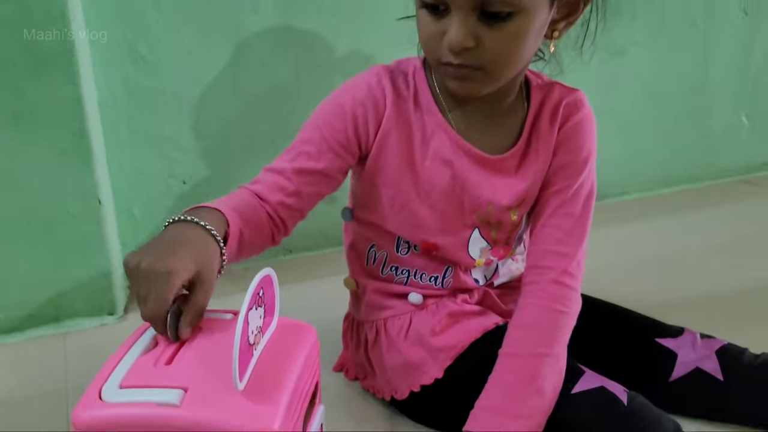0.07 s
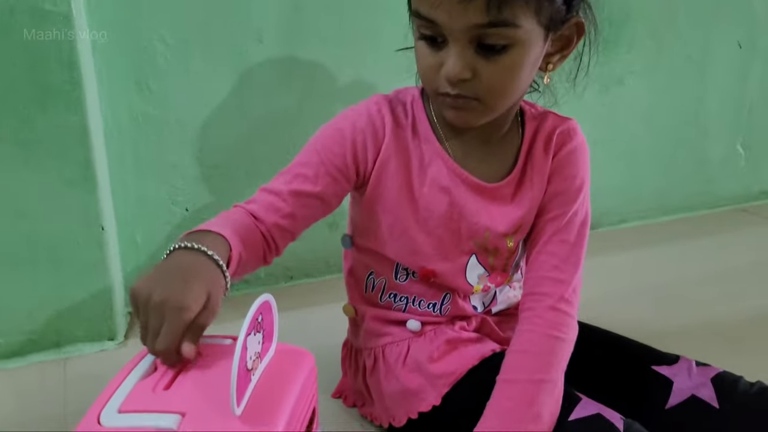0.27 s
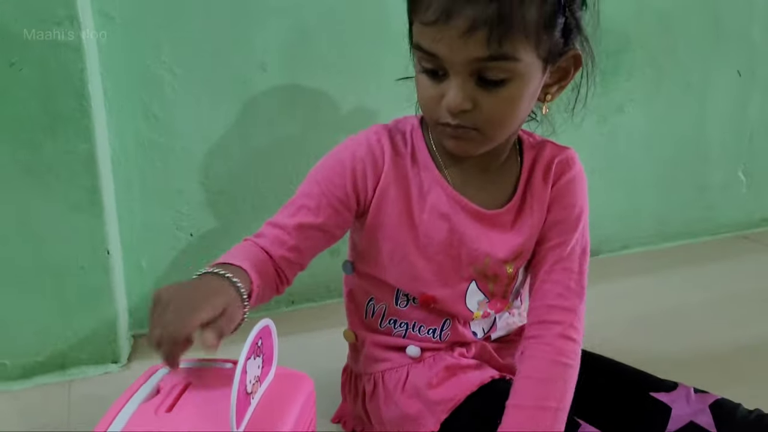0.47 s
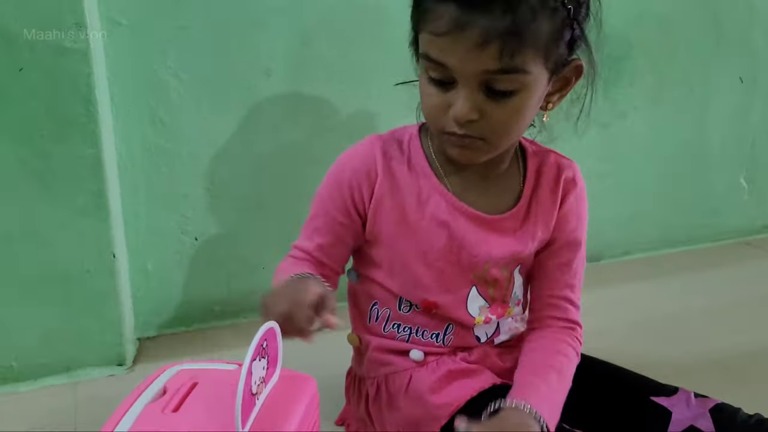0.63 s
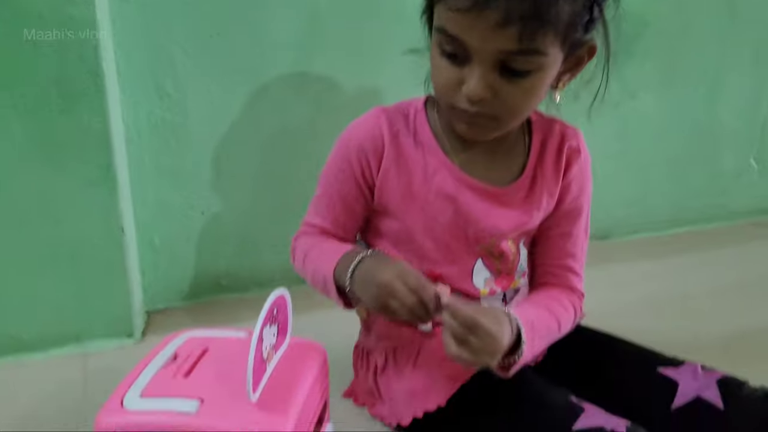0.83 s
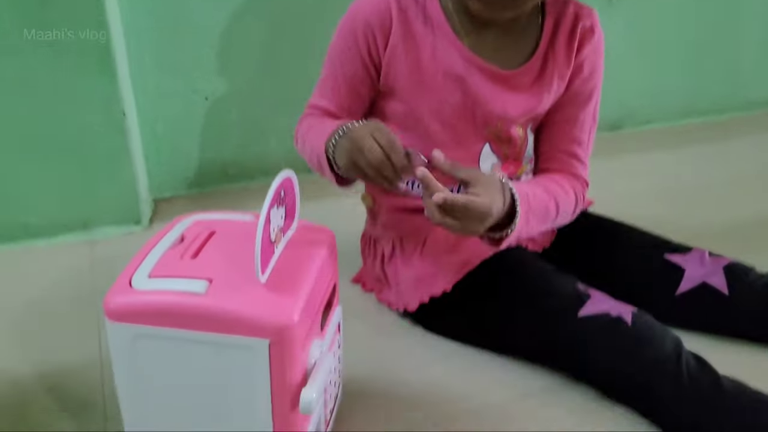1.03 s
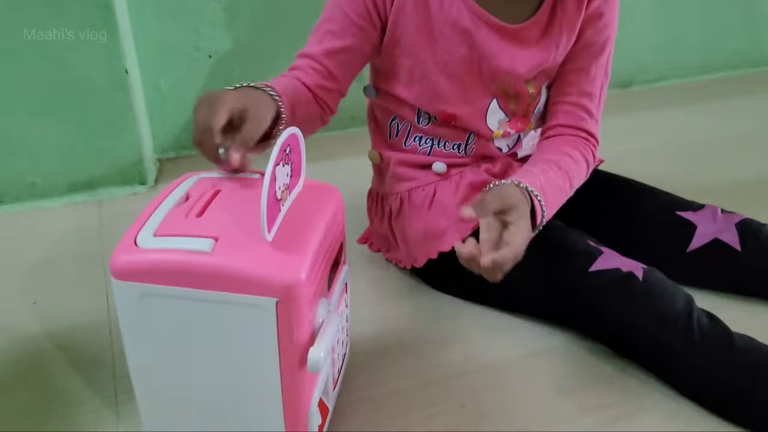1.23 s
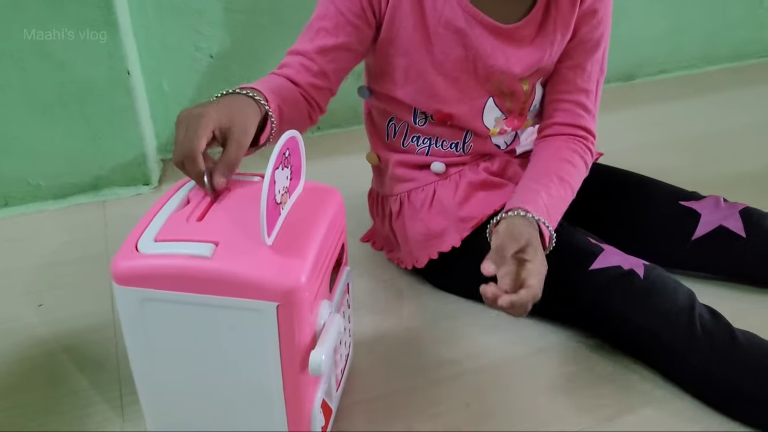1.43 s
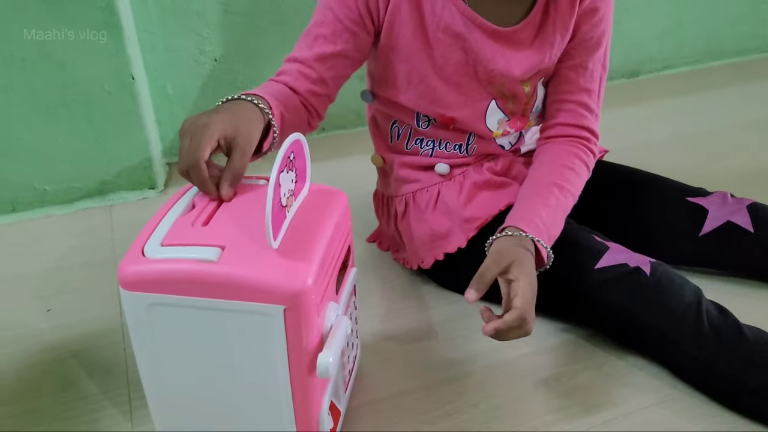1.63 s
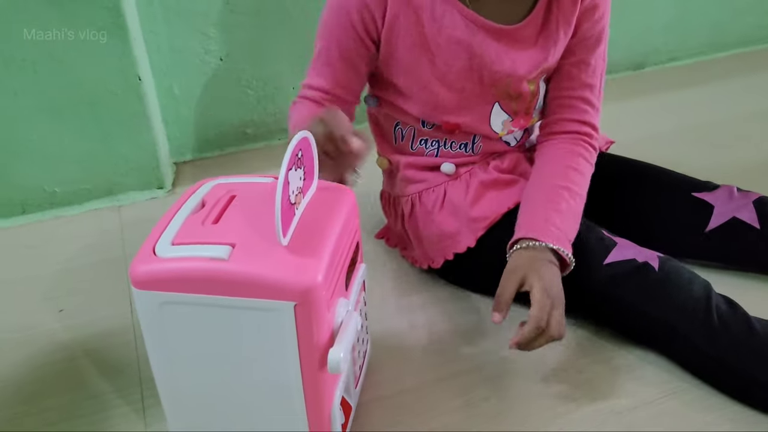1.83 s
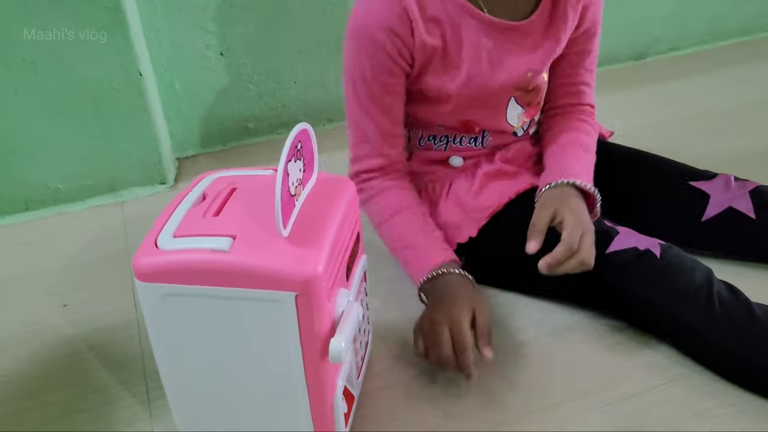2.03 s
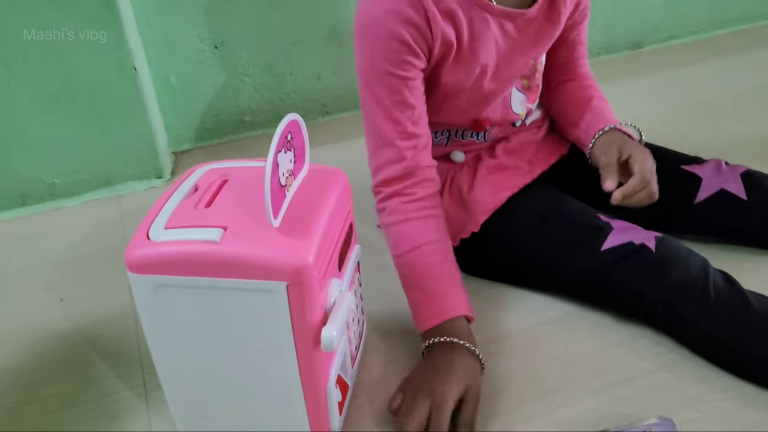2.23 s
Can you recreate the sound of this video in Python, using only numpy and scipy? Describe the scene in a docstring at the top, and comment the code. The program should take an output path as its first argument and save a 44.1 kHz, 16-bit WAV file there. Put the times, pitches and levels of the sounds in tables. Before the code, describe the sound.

Two coins drop into a hollow plastic toy bank. The first clicks in the slot at 0.2 seconds, thumps inside at 0.4 and rattles until 0.7, ringing thinly. Light taps come at 1.2 and 1.5. The second clicks at 1.6, lands at 1.75 and bounces until 2.0. A bangle tinkles faintly near 2.25. The quiet room echoes over a low hum, all on the right side.

```python
"""Two coins drop through the slot of a hollow plastic toy bank in a bare, quiet room.
Each clicks in the slot, thumps onto the bottom, then bounces and rattles to rest, ringing thinly.
Light handling taps fall in between, and a bangle tinkles at the end. The near floor and wall give
quick echoes, the hard room a long tail, over a soft rumble and a wavering hum.
The microphone is on the right channel; the left carries only faint hiss."""
import sys
import numpy as np
from scipy import signal
from scipy.fft import rfft, irfft
from scipy.io import wavfile

SR = 44100
rng = np.random.default_rng(int(sys.argv[2]) if len(sys.argv) > 2 else 0)


def digitize_waveform(pressure):
    """Quantize a signal to 16-bit integers and store it at the path in sys.argv[1].

    Rows of a 2-D input are taken as channels; values are limited to [-1, 1].
    """
    field = np.atleast_2d(pressure).T
    bounded = np.clip(field, -1, 1)
    quanta = np.round(bounded * 32767).astype(np.int16)
    wavfile.write(sys.argv[1], SR, quanta)


N = 101429

# colour of a knock inside the bank, also of the bangle's ticks: (frequency [Hz], gain [dB])
INSIDE_EQ = [(100, -34.5), (250, -15), (450, 3), (620, -3.5), (900, -2.5), (1120, -5.5), (1450, -4),
             (2900, 2.5), (5000, -1), (6000, -5), (7600, -4.5), (8600, -11.5), (12000, -5.5), (15300, -11)]


def amp(db):
    """Decibels to gain."""
    return 10 ** (np.asarray(db) / 20)


def unit(x):
    """Scales to rms 1."""
    return x / np.sqrt(np.mean(x ** 2) + 1e-20)


def read(points, hz):
    """Reads a table on a log-frequency axis."""
    f, value = np.transpose(points)
    return np.interp(np.log(hz + 1), np.log(f + 1), value)


def add(mix, s, sound):
    """Adds a sound to the mix at time s."""
    part = mix[round(s * SR):][:len(sound)]
    part += sound[:len(part)]


def high_pass(x, hz, order):
    """Cuts the lows."""
    return signal.sosfilt(signal.butter(order, hz, "high", fs=SR, output="sos"), x)


def noise(gain):
    """Noise of rms 1 with its spectrum shaped by gain(Hz)."""
    return unit(irfft(rfft(rng.standard_normal(N)) * gain(np.fft.rfftfreq(N, 1 / SR)), N))


def causal(curve_db):
    """Minimum-phase impulse response of energy 1, shaped by the gain curve."""
    log_gain = np.log(amp(np.concatenate([curve_db, np.flip(curve_db[1:-1])])))
    spectrum = np.exp(np.conj(signal.hilbert(log_gain)))
    response = np.fft.ifft(spectrum).real[:len(curve_db)]
    return response / np.linalg.norm(response)


def room_tone():
    """Soft background rumble and hiss with two wavering low tones."""
    # spectrum of the background: (frequency [Hz], relative density [dB])
    colour = [(18, -36), (30, 7), (92, -2), (144, 0.5), (202, 0.5), (249, 1), (399, -5), (970, -18),
              (1140, -19), (2300, -20), (3680, -27.5), (7650, -34), (8950, -42), (15500, -45)]
    # the two hum tones: (centre [Hz], half-width [Hz], trim [dB])
    hum_tones = [(139.4, 6, -1.5), (237.5, 6.7, -3.5)]
    # their wavering, before the trim: (time [s], lower tone [dB], upper tone [dB])
    hum_levels = [(0.0, -53, -58), (0.28, -60, -51), (0.35, -53, -69), (0.42, -47, -57), (0.53, -51, -67),
                  (0.98, -57.5, -61.5), (1.62, -48.5, -48.5), (1.82, -60, -42), (1.98, -48.5, -56),
                  (2.03, -45.5, -41), (2.26, -86, -54), (2.3, -66, -46)]
    out = amp(-47.5) * noise(lambda hz: amp(read(colour, hz)))
    times, *levels = np.transpose(hum_levels)
    for (centre, width, trim_db), level in zip(hum_tones, levels):
        band = noise(lambda hz: np.exp(-((hz - centre) / width) ** 2))
        tone = unit(np.cos(np.angle(signal.hilbert(band))))  # steady level, wandering pitch
        out += amp(trim_db + np.interp(np.arange(N) / SR, times, level)) * tone
    return out


def ring(modes):
    """Dying partials of a struck piece of metal."""
    t = np.arange(SR // 2) / SR
    return sum(amp(db - 60 * t / t60) * np.sin(2 * np.pi * (hz * t + rng.random()))
               for hz, db, t60 in modes)


def rim_pings():
    """A coin caught on its rim pings in one clear partial."""
    # rim strikes: (time [s], level [dB], pitch [Hz], t60 [s])
    pings = [(0.2011, -26, 4970, .07), (.2638, -26.5, 4950, 0.037), (0.278, -45, 14150, 0.076),
             (0.4047, -27.5, 11940, 0.083)]
    out = np.zeros(N)
    for s, db, hz, t60 in pings:
        add(out, s, ring([(hz, db, t60)]))
    return out


def shell_db(hz, spot):
    """The plastic shell's resonances, each excited by an amount that depends on the spot struck."""
    # resonances: (centre [Hz], width [Hz], lift at lid [dB], under first coin [dB], under second [dB])
    resonances = [(900, 174, 0, 6.5, 6), (1375, 236, 7.5, 10, 8), (1970, 170, 7, 4, 3.5),
                  (2542, 97, -6, 2.5, 8), (2810, 180, -1, 2.5, 6), (3100, 110, -1, 1, 1),
                  (3345, 120, 0, 4.5, -1.5), (5040, 580, 4.5, -1, 2), (6250, 490, 3.5, -2.5, 3.5),
                  (7410, 350, 8, 3.5, 5.5)]
    column = ["lid", "first", "second"].index(spot)
    return sum(lifts[column] / (1 + (2 * (hz - f) / width) ** 2) for f, width, *lifts in resonances)


def knock(colour, bass_db, treble_db, decay_ms, spot="lid", size=4096):
    """A burst of chattering contact, coloured by the shell's resonances."""
    rise_s, chatter_s, chatter_db = 0.00027, 0.000567, 3
    bass_hz, treble_hz = 1150, 6700
    t, hz = np.arange(size) / SR, np.fft.rfftfreq(size, 1 / SR)
    grain, chatter = rng.standard_normal((2, size))
    envelope = np.exp(-1000 * t / decay_ms) * (1 - np.exp(-t / rise_s))
    burst = grain * envelope * amp(chatter_db * np.interp(t / chatter_s, np.arange(size), chatter))
    burst *= np.linalg.norm(envelope) / np.linalg.norm(burst)
    bass_shelf = bass_db / (1 + (hz / bass_hz) ** 2)
    treble_shelf = treble_db * hz ** 2 / (hz ** 2 + treble_hz ** 2)
    curve_db = read(colour, hz) + bass_shelf + treble_shelf + shell_db(hz, spot)
    return signal.fftconvolve(burst, causal(curve_db))


def slot_clicks():
    """Coins knock against the slot in the lid and clink on their way in."""
    # contacts with the slot: (time [s], level [dB], bass [dB], treble [dB], decay [ms])
    clicks = [(0.2016, -27, -14, -14, 9.1), (0.207, -15, 4.5, -10.5, 2.72), (0.2658, -23.5, -4, 8, 1.8),
              (0.2785, -15.5, -10, 9.5, 2.9), (1.574, -51, -7, 34, 7), (1.6383, -42, -5, 16, 4.8),
              (1.66, -56, -7, 5, 3.5)]
    # colour of a knock at the slot: (frequency [Hz], gain [dB])
    colour = [(100, -2.5), (400, -2), (900, -2.5), (1450, -3), (2700, 0.5), (4000, 0), (5100, -2),
              (5800, -8.5), (7500, -6.5), (9000, -12.5), (13000, -15.5), (15000, -7.5)]
    # partials of a coin held in the slot: (frequency [Hz], level against the knock [dB], t60 [s])
    held_coin = [(1870, -31, 0.29), (3460, -29, .25), (4823, -40, 0.22)]
    out = np.zeros(N)
    for s, db, bass_db, treble_db, decay_ms in clicks:
        add(out, s, amp(db) * knock(colour, bass_db, treble_db, decay_ms))
        add(out, s, amp(db) * ring(held_coin))
    return out


def coin_bounces():
    """Each bounce knocks the plastic and sets the coin ringing."""
    # strikes inside the bank: (time [s], level [dB], bass [dB], treble [dB], decay [ms])
    strikes = [(0.3926, -14, -2, 5, 6.8), (0.4057, -12.5, 0, 4.5, 4.5), (0.4128, -21.5, 5, 16, 11.4),
               (0.4309, -28.5, 10, 3, 10.5), (.4649, -17.5, -3, -8, 6.2), (0.4834, -17.5, -19.5, -3, 4.8),
               (0.4881, -18.5, 5, -2, 2.7), (.4946, -13.5, -4, -4.5, 3.6), (0.499, -19, 8, 0, 1.95),
               (.5326, -21, -13, -13, 6), (0.5416, -39, -12, -5, 3.2), (0.5624, -45, 1, -15, 2.5),
               (0.6051, -24, -22, -6, 1.6), (.6638, -21.5, -19.5, -12, 5.1), (.6665, -29, -9, -9, 3.7),
               (0.6949, -37.5, -7, 7, 8.6), (1.7392, -12.5, 1, 3.5, 5.34), (1.7506, -23.5, 10, 10, 8.6),
               (1.7607, -19, -25, 5, 5.9), (1.7741, -19.5, 1.5, -0.5, 4.7), (1.7859, -27, -9, 0, 21),
               (1.8154, -17.5, 1, 0, 4.2), (1.8381, -29, -11, 48, 6.4), (1.8588, -25.5, 0, 0, 6.2),
               (1.9105, -31.5, 2, 10, 15), (1.9201, -22.5, -3.5, -3, 3.8), (1.927, -32.5, 3, 8, 6.4),
               (1.9856, -25.5, -16, -13, 7.9), (1.9993, -27.5, 18.5, 28, 8.6), (2.0221, -30, 10, 12, 5.2),
               (2.0341, -37.5, 2, 2, 5.5)]
    # partials of each coin: (frequency [Hz], level against the knock [dB], t60 [s])
    first_coin = [(4968, -30, .14), (7292, -29, .14), (7812, -31, .14), (11452, -29, .14),
                  (12052, -30, .13)]
    second_coin = [(2763, -22, .1), (11156, -35, .18), (12432, -34, .22), (14443, -33, .25),
                   (15429, -25, .22)]
    second_from_s = 1.
    out = np.zeros(N)
    for s, db, bass_db, treble_db, decay_ms in strikes:
        spot, coin = ("first", first_coin) if s < second_from_s else ("second", second_coin)
        add(out, s, amp(db) * knock(INSIDE_EQ, bass_db, treble_db, decay_ms, spot))
        add(out, s, amp(db) * ring(coin))
    return out


def bank_thumps():
    """The heavier bounces make the hollow bank boom in its lowest mode."""
    # booms: (time [s], level [dB], pitch [Hz])
    thumps = [(0.3939, -14, 347), (.406, -25, 326), (0.4951, -24, 341), (1.7407, -19.5, 350),
              (1.7481, -16, 341.8), (1.817, -28.5, 303), (1.9869, -24, 338)]
    rise_s, t60_s = .002, .08
    out, t = np.zeros(N), np.arange(SR // 4) / SR
    envelope = (1 - np.exp(-t / rise_s)) * amp(-60 * t / t60_s)
    for s, db, hz in thumps:
        add(out, s, amp(db) * envelope * np.sin(2 * np.pi * hz * t))
    return high_pass(out, hz=175, order=2)


def handling_taps():
    """Dull little knocks on the plastic as the next coin is brought to the slot."""
    # light taps: (time [s], level [dB], bass [dB], treble [dB], decay [ms])
    taps = [(1.1929, -29.5, -5, -1.5, 4.76), (1.4538, -28, 6, -11, 3.46), (1.4777, -36.5, 14, -8, 4.5)]
    # colour of a tap: (frequency [Hz], gain [dB])
    colour = [(100, -10), (400, -9), (700, 2.5), (1400, -3), (2000, 0.5), (2800, 7), (3600, 0), (6000, -13),
              (8500, -14.5), (15000, -18.5)]
    out = np.zeros(N)
    for s, db, bass_db, treble_db, decay_ms in taps:
        add(out, s, amp(db) * knock(colour, bass_db, treble_db, decay_ms))
    return out


def bangle():
    """A bangle ticks and rings thinly as the hand reaches for the floor."""
    # tinkles: (time [s], tick level [dB], ring level [dB])
    tinkles = [(2.247, -42.5, -73), (2.2753, -44, -60)]
    # the bangle's partials: (frequency [Hz], relative level [dB], t60 [s])
    partials = [(7440, 4, 0.13), (13087, -3, 0.31)]
    out = np.zeros(N)
    for s, tick_db, ring_db in tinkles:
        add(out, s, amp(tick_db) * knock(INSIDE_EQ, bass_db=-6, treble_db=3, decay_ms=2.4))
        add(out, s, amp(ring_db) * ring(partials))
    return out


def room_reverb(x):
    """Quick echoes from the near floor and wall, then a diffuse tail that dies sooner in the treble."""
    # decay of the tail: (frequency [Hz], t60 [s])
    tail_t60 = [(150, 3.26), (350, 1.04), (1000, 0.9145), (3000, 0.97), (7000, 0.77), (11000, 0.58),
                (15500, 0.46)]
    # colour of the tail: (frequency [Hz], gain [dB])
    colour = [(150, -4.5), (350, 1), (700, -0.5), (1400, 5), (3000, 0), (7000, 0.5), (10000, 1),
              (15500, -0.5)]
    tail_db, delay_s, build_s = -6, 0.0013, 0.0017
    early_db, early_t60_s, echoes_per_s = -14, 0.41, 2500
    t = np.arange(SR * 3 // 2) / SR
    build = 1 - np.exp(-np.maximum(t - delay_s, 0) / build_s)
    tail, early = rng.choice([-1., 1.], (2, len(t)))
    hz, frame_s, bands = signal.stft(tail, SR, nperseg=256)
    bands *= amp(read(colour, hz)[:, None] - 60 * frame_s / read(tail_t60, hz)[:, None])
    tail = signal.istft(bands, SR, nperseg=256)[1][:len(t)] * build
    arrivals = rng.random(len(t)) < echoes_per_s / SR
    early *= arrivals * build * amp(-60 * t / early_t60_s)
    response = amp(tail_db) * tail / np.linalg.norm(tail) + amp(early_db) * early / np.linalg.norm(early)
    return signal.fftconvolve(x, response)[:N]


def scene():
    """The bank in its room, heard in the right channel only."""
    direct = slot_clicks() + handling_taps() + coin_bounces() + rim_pings() + bank_thumps() + bangle()
    return np.array([np.zeros(N), direct + room_reverb(direct) + room_tone()])


def record(dry):
    """Microphone gain and low cut, a soft ceiling, hiss in the idle left channel, then a top cut."""
    # spectrum of the hiss: (frequency [Hz], relative density [dB])
    hiss_colour = [(20, -11), (80, 4), (190, -2), (280, 0), (450, -3.5), (1000, -7), (4500, -9),
                   (6500, -15), (7500, -21), (9000, -24), (11000, -1.5), (15000, -6)]
    gain_db, ceiling, hiss_db, top_hz = 6, .85, -72.3, 15600
    out = amp(gain_db) * high_pass(dry, hz=36, order=8)
    out = out / (1 + (out / ceiling) ** 6) ** (1 / 6)
    out[0] += amp(hiss_db) * noise(lambda hz: amp(read(hiss_colour, hz)))
    top_cut = signal.firwin(511, top_hz, window=("kaiser", 8), fs=SR)
    return signal.oaconvolve(out, top_cut[None], "same")


dry = scene()
out = record(dry)
digitize_waveform(out)
```